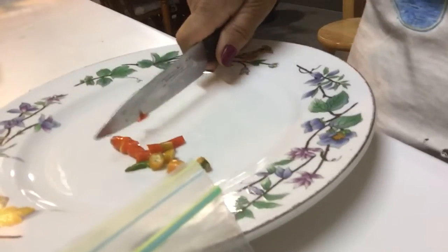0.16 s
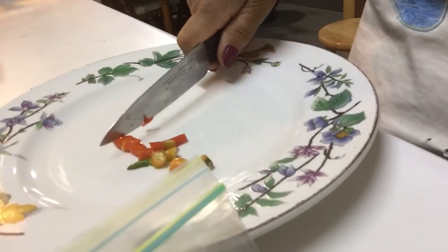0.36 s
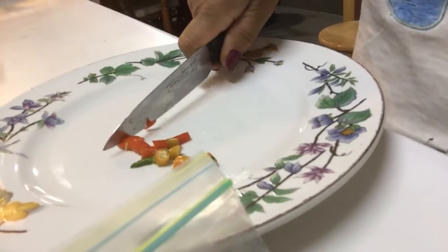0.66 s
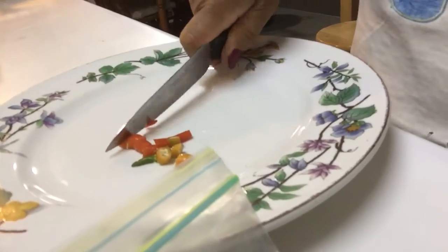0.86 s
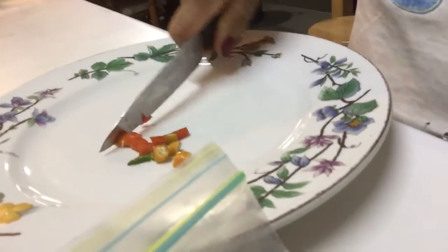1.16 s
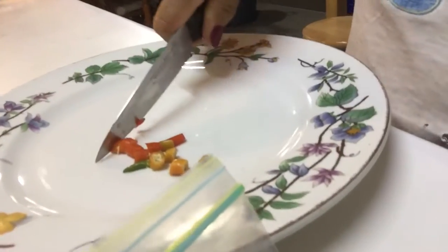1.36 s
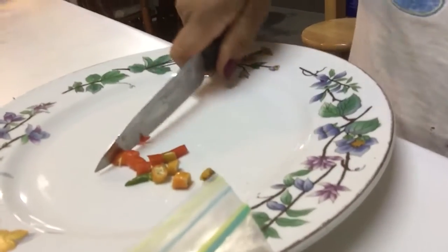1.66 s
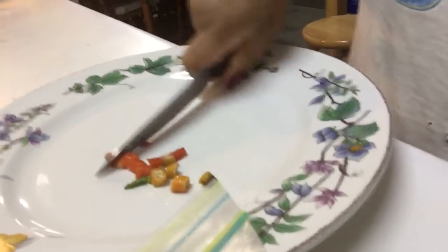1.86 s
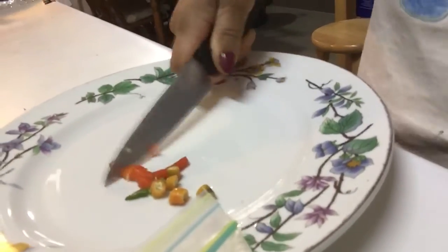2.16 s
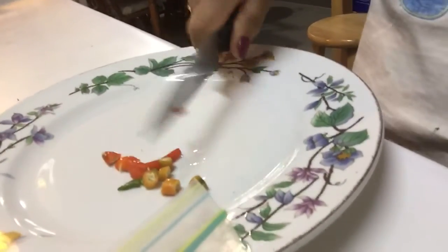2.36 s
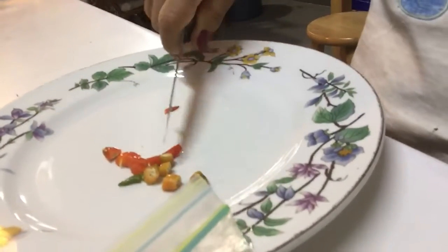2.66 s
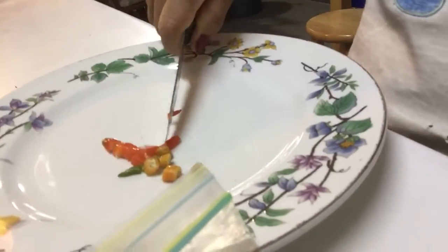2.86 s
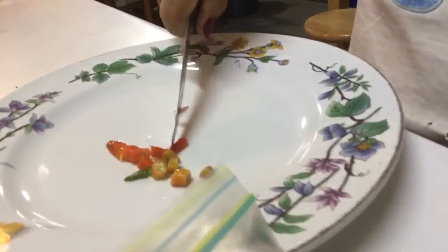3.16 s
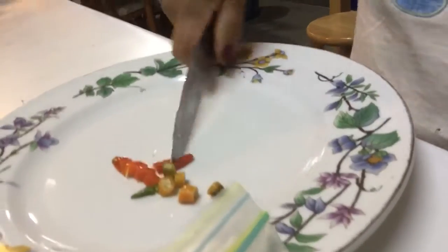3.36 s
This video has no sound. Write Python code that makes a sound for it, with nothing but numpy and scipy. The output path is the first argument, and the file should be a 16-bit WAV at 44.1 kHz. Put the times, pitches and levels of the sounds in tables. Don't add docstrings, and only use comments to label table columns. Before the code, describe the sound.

Knife on a ceramic plate: three hard clacking chops, light ticks and rubs, quiet room.

```python
import sys
import numpy as np
from scipy import signal
from scipy.fft import rfft, irfft
from scipy.io import wavfile

SR = 44100
rng = np.random.default_rng(int(sys.argv[2]) if len(sys.argv) > 2 else 0)


def gain_from_db(level_db):
    decades = np.asarray(level_db, float) / 20
    return 10 ** decades


def pcm_store(signal):
    levels = np.round(np.clip(np.atleast_2d(signal), -1, 1) * 32767)
    wavfile.write(sys.argv[1], SR, levels.astype(np.int16).T)


N = 154350

# freq_hz [Hz], level_db [dB]
AIR_SPECTRUM = [(15, -45.5), (25, -17), (123, -8), (326, -11), (354, -6.5), (503, -17.5), (1790, -26.5),
                (7110, -32.5), (16000, -45)]
# start_s [s], low_mode_db [dB], high_modes_db [dB], spot [0 rim, 1 near rim, 2 middle]
TABLE_PUSHES = [
    (0.01, -51, -93, 1),
    (0.713, -28.5, -32, 0),
    (1.565, -58, -81, 1),
    (1.815, -40, -64, 1),
    (1.983, -27.5, -25.5, 1),
    (2.23, -38, -59.5, 0),
    (2.877, -48, -80, 0),
    (3.302, -21, -30, 2),
]
# pitch_hz [Hz], t60_s [s], rim_db [dB], near_rim_db [dB], middle_db [dB]
TABLE_MODES = [(121.3, 0.21, -16, -8.5, -7), (142.2, 0.11, -6.5, -5, -7), (223, 0.08, -4.5, -6, -7.5),
               (257.4, .1, 0, -3, 1.5), (430, 0.029, 4.5, 5.5, -9), (549.5, 0.022, 0, 0, -4),
               (706, 0.033, 1, 4.5, -3), (1190, 0.027, -5, -1, -4)]
# time_s [s], level_db [dB], centre_hz [Hz]
WIPE_CURVE = [
    (2.14, -88, 1490),
    (2.183, -53, 1297),
    (2.215, -62.5, 2200),
    (2.225, -55, 7500),
    (2.26, -59.5, 6960),
    (2.29, -72.5, 8000),
    (2.32, -75.5, 13500),
    (2.42, -81.5, 13500),
]
# time_s [s], level_db [dB], brightness [dB per octave]
RUB_CURVE = [(0.52, -86, 7), (0.6, -71, 4.5), (0.87, -57, 0.5), (0.95, -63, -11), (1.0, -80, 4),
             (1.68, -78, -10), (1.76, -52, -3.5), (1.83, -73.5, -22), (1.97, -59.5, 9.5),
             (2.12, -52.5, -27), (2.17, -59.5, -6), (2.24, -48.5, 9), (2.33, -80.5, 5), (2.88, -88.5, 1.5),
             (2.98, -57.5, 1), (3.1, -70.5, 4), (3.2, -59, 2.5), (3.5, -52.5, 2.5)]
# pitch_hz [Hz], level_db [dB], t60_s [s]
PLATE_MODES = [(1710, -22.5, 0.038), (1931, -0.5, 0.031), (1986.3, 3, 0.025), (2025, -21.5, 0.012),
               (2755, -6, 0.047), (3314, -16.5, 0.044), (3937, -16.5, 0.045), (4362, -14.5, 0.032),
               (5812, -25.5, .07), (6276, -30, 0.035), (7960, -33, .06), (10490, -51, .06),
               (12440, -47, .05), (14900, -52, .055)]
# rim_db [dB], near_rim_db [dB], middle_db [dB]
SPOT_LEVELS = [(-12.5, -18, -27), (-4, 4.5, -1), (2.5, -21.5, 2.5), (-19, -23, -18), (-3.5, -17.5, -7.5),
               (-16.5, -37, -14), (-15, -34.5, -12), (-10, -31, -11), (-12.5, -32, -27.5),
               (-44, -30, -43.5), (-30, -38.5, -34), (-55, -50, -60), (-42, -51.5, -35.5),
               (-40, -61, -59.5)]
# start_s [s], peak_db [dB], brightness [dB per octave]
LIGHT_TOUCHES = [(0.8315, -45.5, -11), (0.8649, -38, 0.5), (0.8764, -46.5, 1), (0.8904, -50, -6),
                 (0.9258, -51.5, -12), (1.2176, -39.5, -4.5), (1.2356, -47, -7), (1.5549, -45.5, -22),
                 (1.7045, -45, -6), (1.7464, -42, -3), (1.7564, -42, -8), (1.7724, -67, -9.5),
                 (2.0717, -50, -0.5), (2.2223, -40.5, -5), (2.2383, -35, -18), (2.2657, -41, -7.5),
                 (2.8714, -33.5, -3.5), (2.9721, -44, -1.5), (3.0185, -46.5, 3), (3.0494, -52.5, -2),
                 (3.1467, -51.5, 1.5), (3.1652, -48, -4), (3.1926, -48.5, 4.5), (3.2041, -45.5, -3),
                 (3.4516, -43.5, -2)]
# start_s [s], peak_db [dB], spot [0 rim, 1 near rim, 2 middle],
# crack_db [dB], rattle_db [dB]
CHOP_STEPS = [(0.6992, -44, 0, -56, -72), (0.703, -37, 0, -54, -63), (0.7068, -28, 0, -55, -70),
              (0.7126, -23, 0, -45.5, -60), (1.957, -45.5, 1, -74.5, -84), (1.9705, -19, 1, -49.5, -70),
              (1.98, 2, 1, -20.5, -44.5), (3.2782, -39, 2, -55, -77.5), (3.2806, -36, 2, -57, -59),
              (3.2966, -9, 2, -27, -59), (3.301, 5, 2, -13.5, -34)]


def rms_one(x):
    return x / np.sqrt(np.mean(x ** 2) + 1e-20)


def noise():
    return rng.standard_normal(N)


def band_pass(low_hz, high_hz, x, order=1):
    return signal.sosfilt(signal.butter(order, [low_hz, high_hz], "band", fs=SR, output="sos"), x)


def low_pass(order, cut_hz, x):
    return signal.sosfilt(signal.butter(order, cut_hz, fs=SR, output="sos"), x)


def high_pass(order, cut_hz, x):
    return signal.sosfilt(signal.butter(order, cut_hz, "high", fs=SR, output="sos"), x)


def in_time(rows):
    time_s, *columns = np.transpose(rows)
    return [np.interp(np.arange(N) / SR, time_s, c) for c in columns]


def drift(rate_hz):
    r, settle = np.exp(-2 * np.pi * rate_hz / SR), 9000
    wander = signal.lfilter([1], [1, -2 * r, r * r], rng.standard_normal(N + settle))
    return rms_one(wander[settle:])


def coloured(points, x):
    hz, db = np.transpose(points)
    log_hz = np.log(np.fft.rfftfreq(len(x), 1 / SR) + 1)
    gain = gain_from_db(np.interp(log_hz, np.log(hz), db, left=-60, right=-60))
    return rms_one(irfft(rfft(x) * gain, len(x)))


def strike(modes, rise_s, boost_db):
    hz, db, t60_s = np.transpose(modes)[:, :, None]
    t = np.arange(int(0.3 * SR)) / SR
    envelope = gain_from_db(db + boost_db[:, None] - 60 * t / t60_s)
    tones = envelope * np.sin(2 * np.pi * hz * t)
    return tones.sum(axis=0) * (1 - np.exp(-t / rise_s)) ** 2


def add(out, start_s, x):
    i = int(start_s * SR)
    out[i:i + len(x)] += x[:N - i]


def air():
    tone = gain_from_db(-66.5 + 0.39 * drift(4)) * coloured(AIR_SPECTRUM, noise())
    hum_hz, width_hz = 350, 25
    hum = rms_one(band_pass(hum_hz - width_hz / 2, hum_hz + width_hz / 2, noise()))
    hiss = high_pass(4, 11500, noise())
    return tone + gain_from_db(-78) * hum + gain_from_db(-88) * hiss


def room(x):
    t60_s, delay_s = 0.35, 0.0014
    t = np.arange(SR // 2) / SR
    diffuse = rng.standard_normal(len(t)) * np.clip(t / delay_s - 1, 0, 1)
    low = low_pass(1, 8000, diffuse)
    tail = low * gain_from_db(-60 * t / t60_s) + (diffuse - low) * gain_from_db(-60 * t / (0.36 * t60_s))
    return signal.fftconvolve(x, tail / np.sqrt(np.sum(tail ** 2)) * 10)[:N]


def table():
    out, modes = np.zeros(N), np.array(TABLE_MODES)
    boom_hz = 69.4
    for start_s, low_db, high_db, spot in TABLE_PUSHES:
        boom = [(boom_hz, low_db, 0.15), (boom_hz * 0.7, low_db - 1.5, 0.15)]
        add(out, start_s, strike(boom, 0.008, np.zeros(2)))
        knock = modes[:, [0, 2 + int(spot), 1]]
        add(out, start_s, strike(knock, 0.0015, np.full(len(modes), high_db)))
    return out


def rattle():
    out, t = np.zeros(N), np.arange(SR // 4) / SR
    for start_s, *_, rattle_db in CHOP_STEPS:
        buzz = low_pass(4, 12500, band_pass(600, 5000, rng.standard_normal(len(t))))
        add(out, start_s, gain_from_db(rattle_db - 60 * t / 0.32) * buzz)
    return out * gain_from_db(3.4 * drift(150))


def wipe():
    out, (level_db, centre_hz) = np.zeros(N), in_time(WIPE_CURVE)
    away = np.abs(np.arange(N) / SR - 2.28) > 0.14
    level_db = level_db - 60 * away
    slope_db = 8
    for low_hz in 600 * 2 ** np.arange(0, 5, 0.5):
        high_hz = low_hz * np.sqrt(2)
        band = rms_one(band_pass(low_hz, high_hz, noise(), order=2))
        octaves_off = np.abs(np.log2(centre_hz / np.sqrt(low_hz * high_hz)))
        out += band * gain_from_db(level_db - 7 - slope_db * octaves_off)
    return out * gain_from_db(2 * drift(300))


def rub():
    out, (level_db, brightness) = np.zeros(N), in_time(RUB_CURVE)
    slips_per_s, spread_db, lump_db = 700, 3, -0.5
    slips = rng.random(N) < slips_per_s / SR
    slips = slips * gain_from_db(spread_db * np.minimum(rng.exponential(1, N), 4))
    slips = rms_one(slips * gain_from_db(lump_db * drift(25))) * gain_from_db(level_db - 22.5)
    for hz, db, t60_s in PLATE_MODES:
        r, w = gain_from_db(-60 / (t60_s * SR)), 2 * np.pi * hz / SR
        tilt_db = (brightness + 1) * max(np.log2(hz / 2000), 0)
        push = slips * noise() * gain_from_db(db + tilt_db)
        out += signal.lfilter([0, np.sin(w)], [1, -2 * r * np.cos(w), r * r], push + 1e-18)
    return out


def crack():
    t = np.arange(1500) / SR
    envelope = gain_from_db(-60 * t / 0.011) + gain_from_db(-24 - 60 * t / 0.036)
    return band_pass(700, 10003, rng.standard_normal(len(t))) * envelope


def touches():
    rings, cracks = np.zeros(N), np.zeros(N)
    octaves_up = np.maximum(np.log2(np.array(PLATE_MODES)[:, 0] / 2000), 0)
    for start_s, peak_db, brightness in LIGHT_TOUCHES:
        scatter_db = 1.5 * rng.standard_normal(len(PLATE_MODES))
        boost_db = peak_db + brightness * octaves_up + scatter_db
        add(rings, start_s, strike(PLATE_MODES, 0.001, boost_db))
        add(cracks, start_s, gain_from_db(peak_db - 32 + 1.5 * brightness) * crack())
    return rings, cracks


def chops():
    rings, cracks = np.zeros(N), np.zeros(N)
    usual_db, spots = np.array(PLATE_MODES)[:, 1], np.array(SPOT_LEVELS)
    for start_s, peak_db, spot, crack_db, _ in CHOP_STEPS:
        boost_db = peak_db + spots[:, int(spot)] - usual_db
        add(rings, start_s, strike(PLATE_MODES, 0.00055, boost_db))
        add(cracks, start_s, gain_from_db(crack_db) * crack())
    return rings, cracks


def scene():
    touch_rings, touch_cracks = touches()
    chop_rings, chop_cracks = chops()
    rings, cracks = touch_rings + chop_rings, touch_cracks + chop_cracks
    plate, boom = rings + rub() + wipe(), table()
    send = gain_from_db(-47) * plate + gain_from_db(-38.5) * high_pass(4, 3600, rings)
    send += gain_from_db(-45.5) * low_pass(2, 7900, cracks) + gain_from_db(-37) * boom
    return (plate + cracks + boom + room(send) + rattle() + air())[None]


def band_limit(x):
    return signal.sosfilt(signal.butter(12, 16270, fs=SR, output="sos"), x)


def record(dry):
    x = high_pass(2, 44, dry)
    top, knee = 0.94, 7.6
    x = x / (1 + np.abs(x / top) ** knee) ** (1 / knee)
    mix = signal.sosfilt(signal.cheby2(12, 50, 16700, fs=SR, output="sos"), x)
    return band_limit(mix)


dry = scene()
out = record(dry)
pcm_store(out)
```